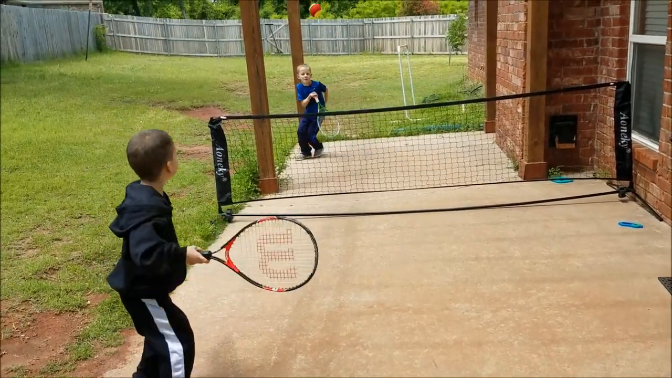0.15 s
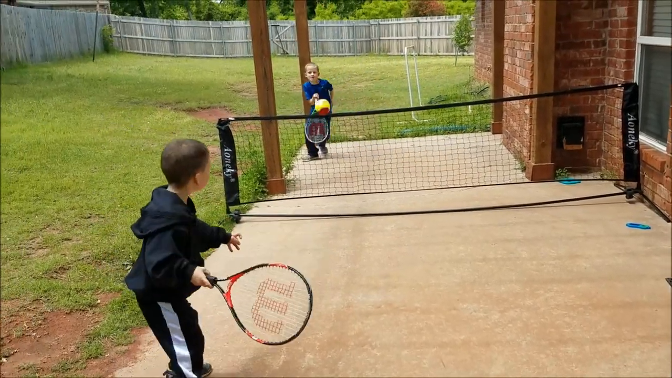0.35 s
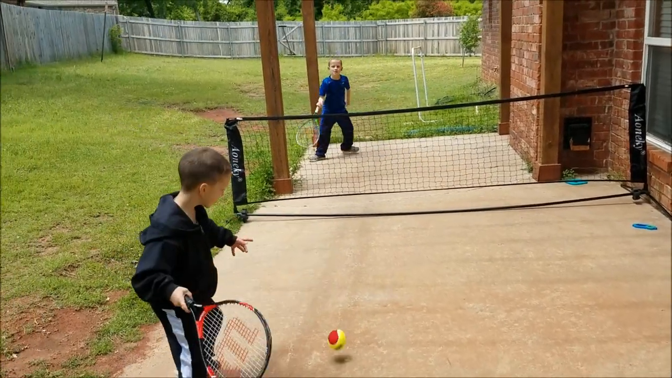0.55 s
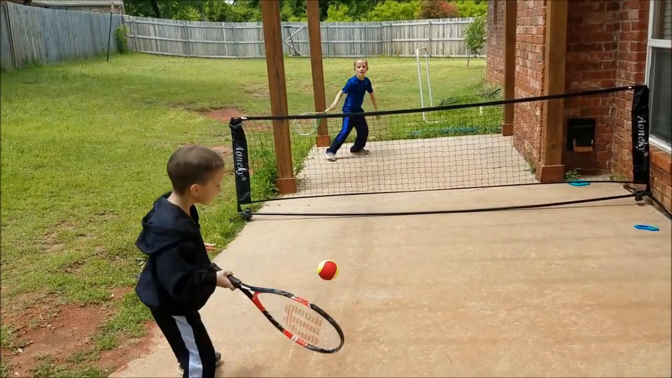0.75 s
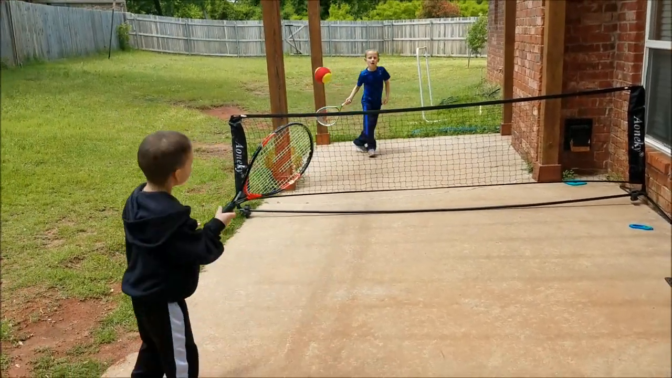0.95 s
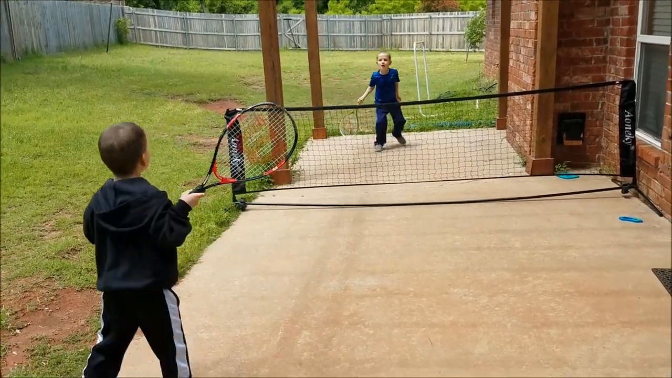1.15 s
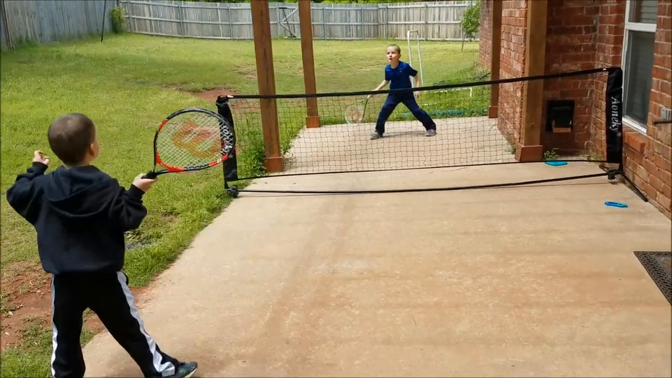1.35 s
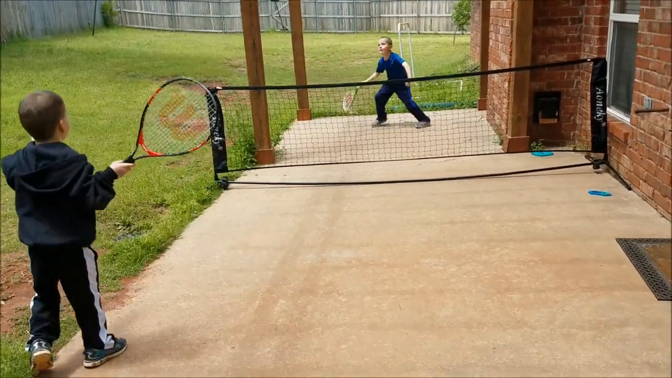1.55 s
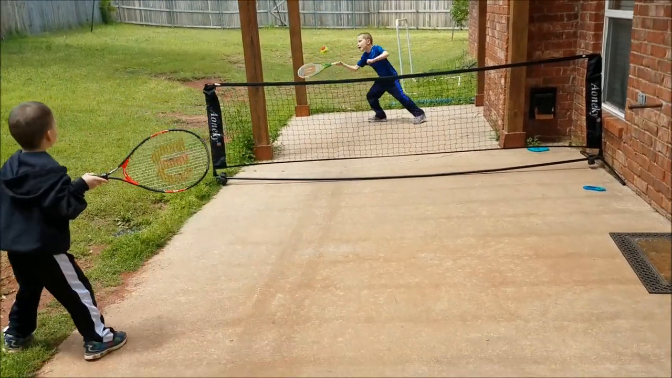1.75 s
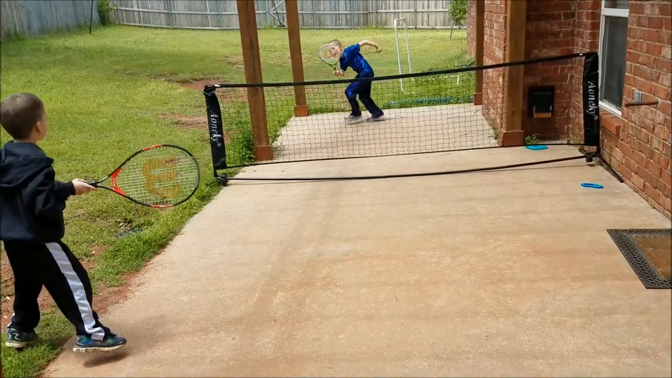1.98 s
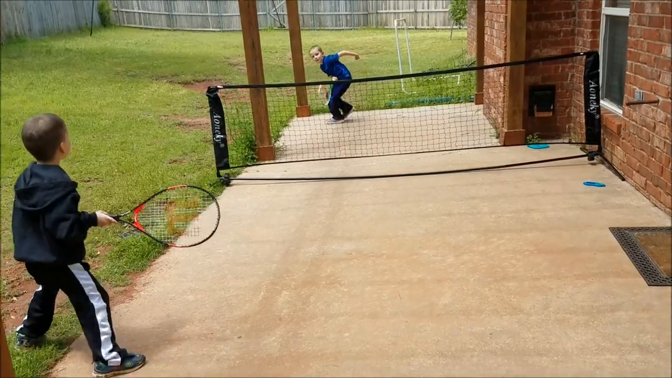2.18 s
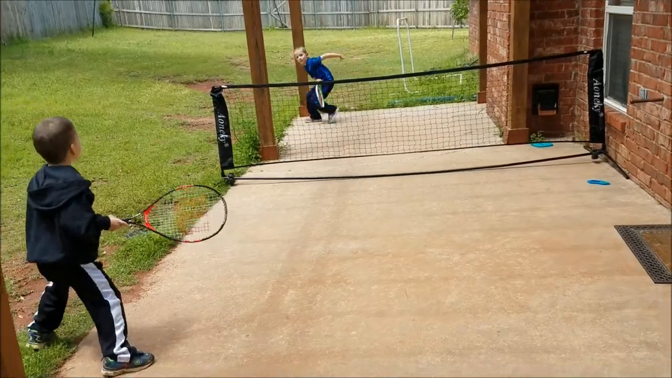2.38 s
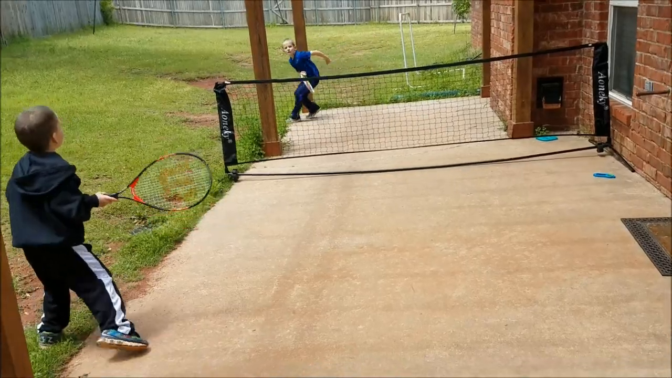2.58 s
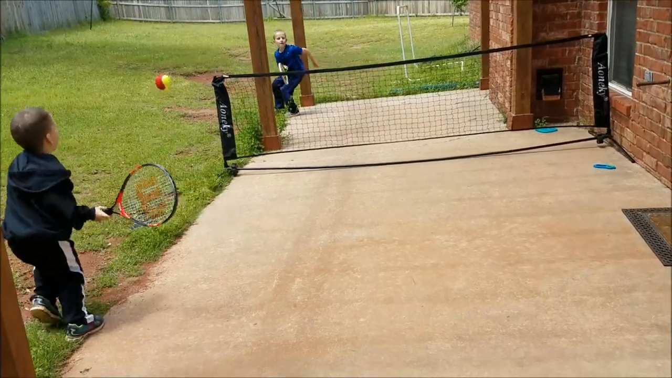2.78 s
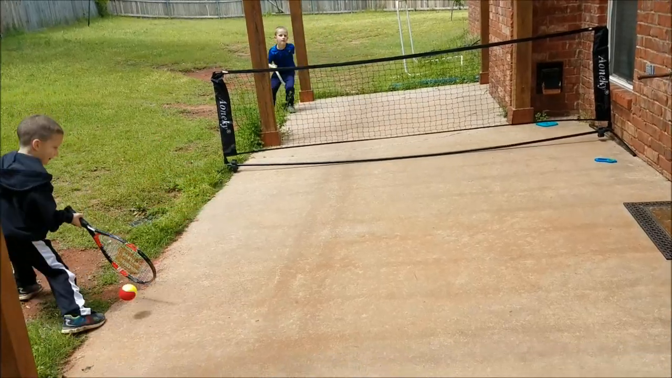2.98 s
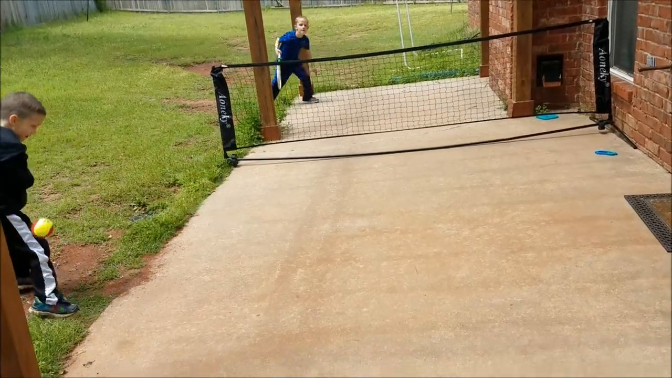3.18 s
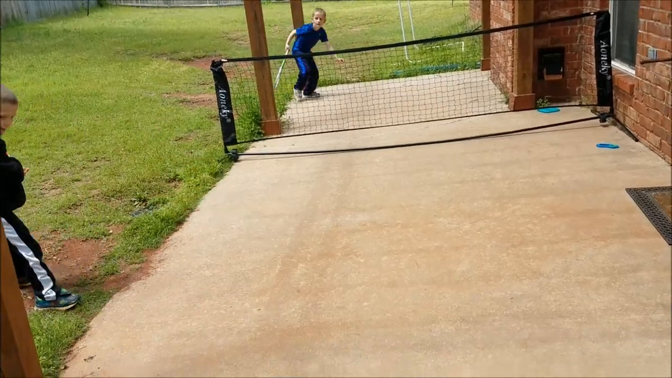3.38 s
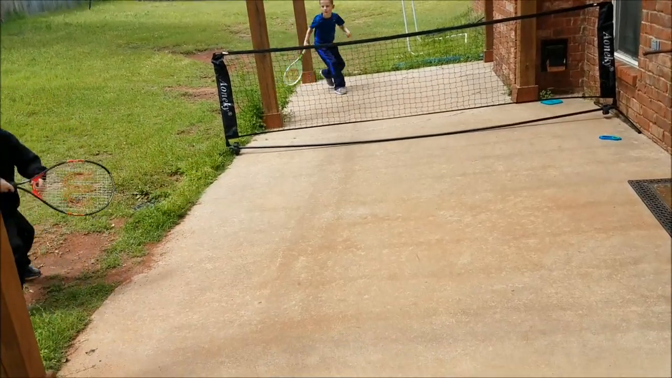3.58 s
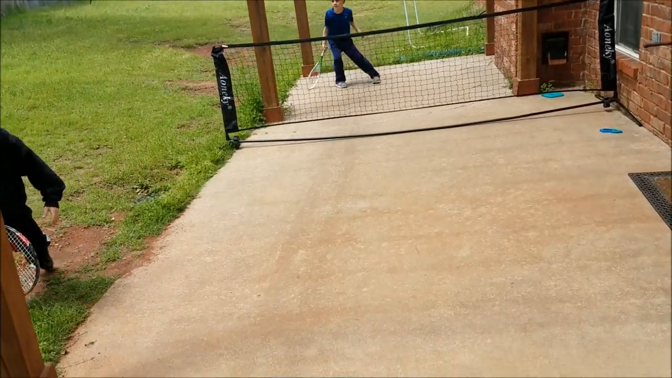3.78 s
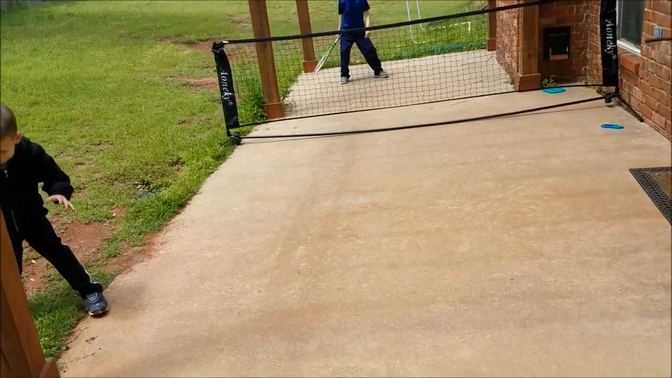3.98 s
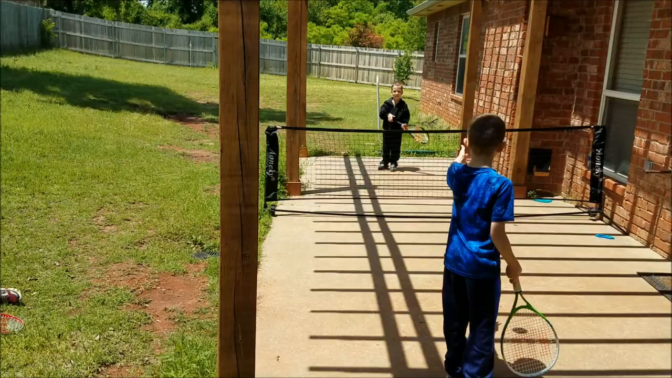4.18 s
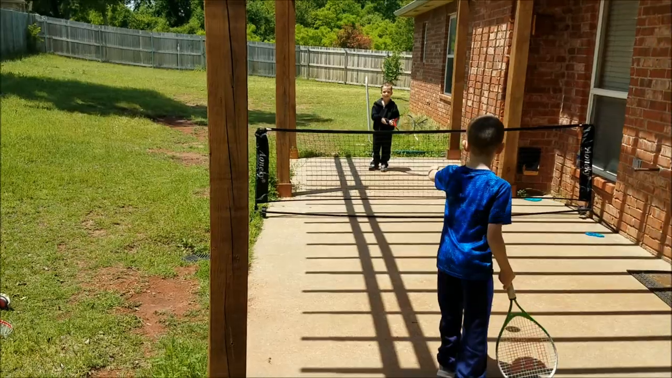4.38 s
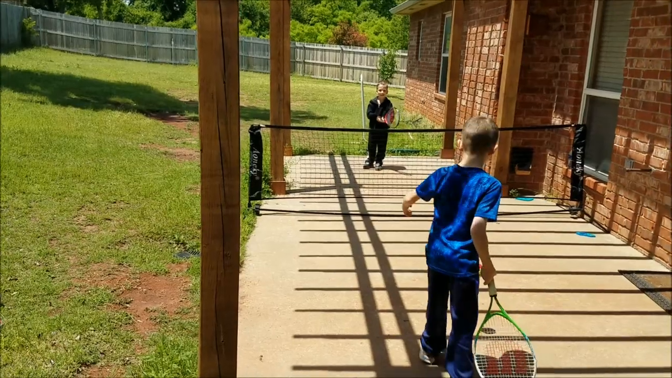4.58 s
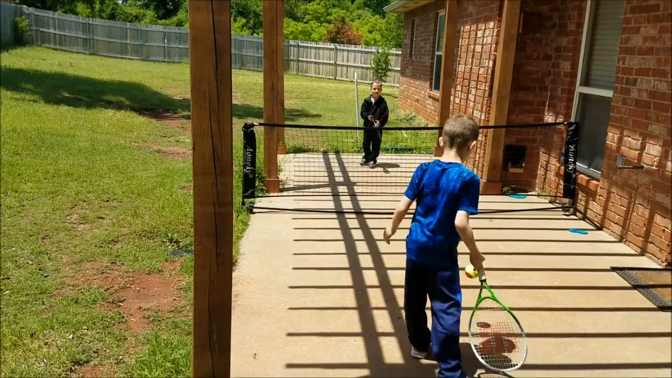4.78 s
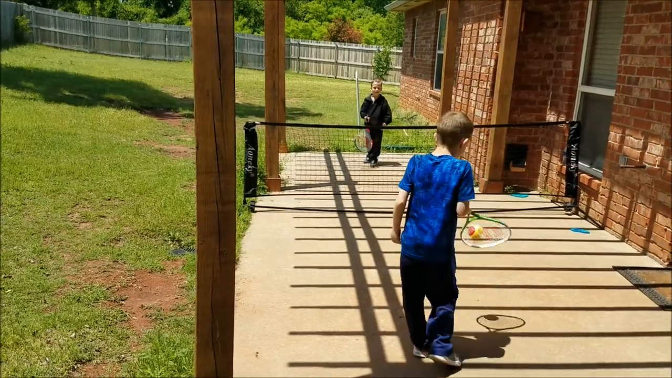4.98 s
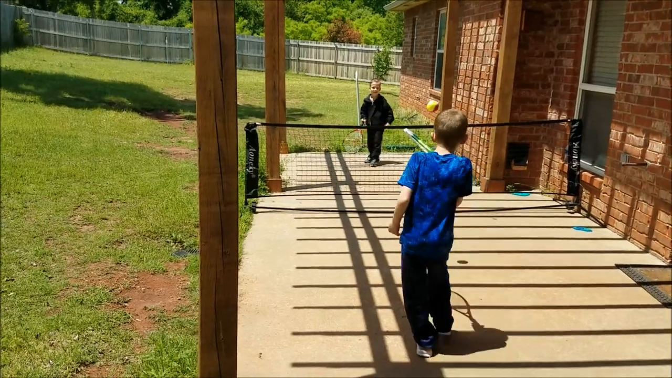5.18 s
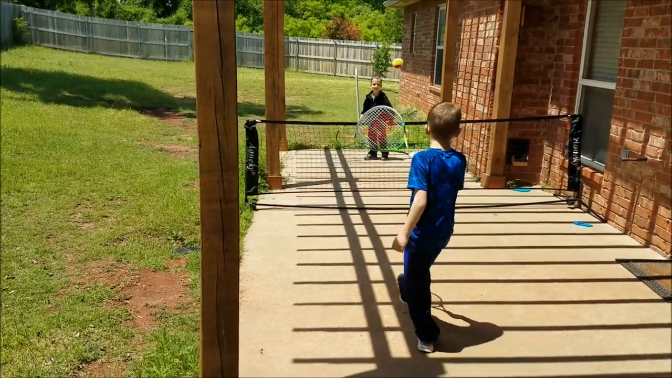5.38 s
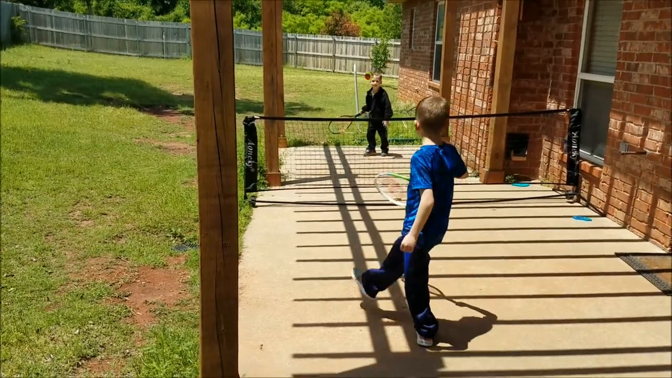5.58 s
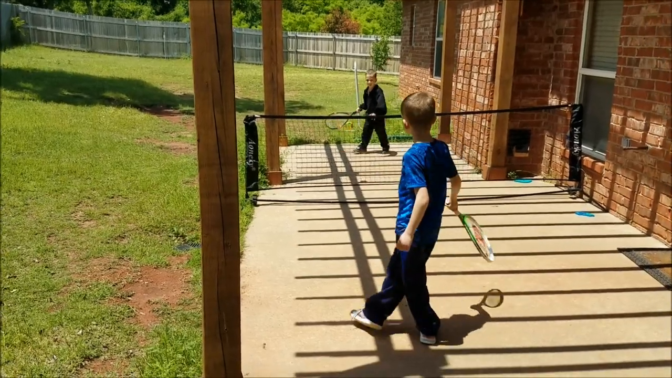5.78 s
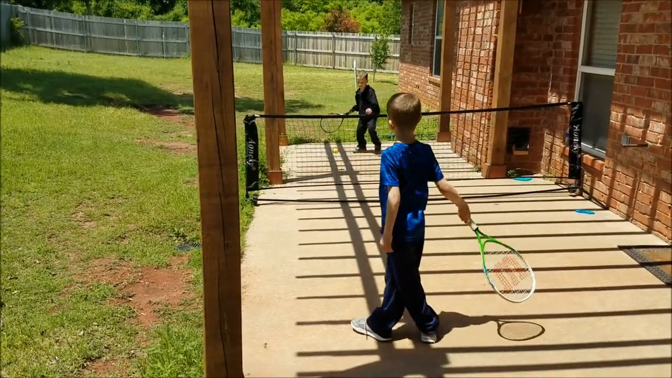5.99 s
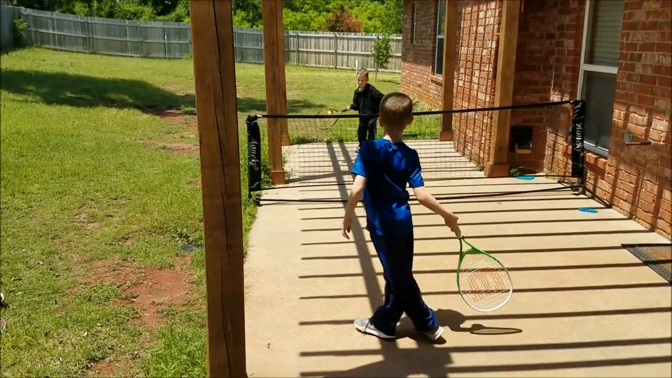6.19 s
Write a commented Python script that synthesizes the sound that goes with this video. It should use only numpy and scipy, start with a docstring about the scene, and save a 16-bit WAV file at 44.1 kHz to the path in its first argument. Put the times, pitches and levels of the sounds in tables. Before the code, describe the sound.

On a roofed concrete patio, shoes drag and scuff over grit, then a hollow ball bounces sharply and a strung racket pops it away. Softer hits and bounces follow, with scuffing feet, heavy footfalls and a racket frame clack. The sound cuts out just after four seconds and fades back into a shorter, quieter rally with faint far whistles. Close stereo microphones catch light air and low wind buffeting.

```python
"""Two children play mini tennis close by on a roofed concrete patio beside a brick wall, heard by two microphones.
First shoes drag and land on grit; then a hollow ball bounces and small strung rackets strike it, ringing their modes.
A far whistle (wavering tone) and a racket frame's clack (coloured noise) come late in this first rally.
Near 4.1 s the sound drops out, then fades back in on a second, shorter rally, with more far whistles towards its end.
Outdoor air (shaped noise) and low buffeting at the microphones lie under it all; the patio answers ball, frame and feet."""
import sys
import numpy as np
from scipy import signal
from scipy.fft import rfft, irfft
from scipy.io import wavfile

SR = 44100
rng = np.random.default_rng(int(sys.argv[2]) if len(sys.argv) > 2 else 0)


def digitize_waveform(pressure):
    """Quantize a signal to 16-bit integers and store it at the path in sys.argv[1].

    Rows of a 2-D input are taken as channels; values are limited to [-1, 1].
    """
    field = np.atleast_2d(pressure).T
    bounded = np.clip(field, -1, 1)
    quanta = np.round(bounded * 32767).astype(np.int16)
    wavfile.write(sys.argv[1], SR, quanta)


N = 275625

# outdoor air in the first and in the second rally: [f/Hz, level/dB per Hz]
AIR_FIRST = [(20, -13.5), (70, -21.5), (130, -31.5), (220, -9.5), (400, -4.5), (620, -2.5), (900, -7),
             (1500, -6.5), (2400, -6.5), (3500, -9), (5200, -17), (8000, -21), (12000, -20), (16000, -21.5)]
AIR_SECOND = [(20, -16), (70, -26), (130, -40), (220, -7.5), (420, -2.5), (600, -2), (900, -8), (1500, -9),
              (2400, -10.5), (3500, -11), (5200, -19), (8000, -25), (12000, -25), (16000, -24.5)]
# low buffeting at the microphones: [f/Hz, level/dB per Hz]
BUFFETING = [(15, -30), (50, -7), (90, -1), (130, -4), (200, -8.5), (320, -13), (700, -42.5), (3000, -63)]
# swells of the buffeting: [peak t/s, half-length t/s, level/dB]
GUSTS = [(.77, 0.34, -48), (1.896, 0.13, -58.5), (3.774, 0.29, -47), (4.746, 0.68, -53)]
# faint far whistles, perhaps birds: [start t/s, length t/s, f/Hz, level/dB]
WHISTLES = [(3.077, .12, 3340, -56), (5.42, .2, 2120, -61), (5.586, 0.18, 2700, -64),
            (5.63, 0.194, 2120, -63), (6.017, 0.25, 2420, -58.5)]
# a shoe lands on grit: [t/s, skid t/s, grit level/dB, footfall level/dB]
STEPS = [(.353, 0.021, -30.5, -43), (1.021, 0.037, -44.5, -47.5), (1.532, 0.041, -39.5, -47),
         (1.82, 0.03, -47, -64), (2.071, .02, -44.5, -50), (2.185, .03, -51, -51.5),
         (2.326, 0.038, -47, -63), (2.576, 0.041, -44.5, -56), (2.756, 0.024, -44, -42.5),
         (2.964, 0.051, -44.5, -41), (3.562, 0.0059, -41, -48), (3.697, .009, -48, -51),
         (3.801, 0.0074, -26.5, -58), (4.004, 0.034, -43.5, -47), (4.646, 0.022, -52.5, -67),
         (5.818, 0.025, -51, -47), (5.868, 0.032, -48, -55.5)]
# a shoe is dragged over grit: [peak t/s, swell t/s, grit level/dB, footfall level/dB]
DRAGS = [(.03, 0.054, -38, -41.5), (.15, 0.072, -44, -64), (.2, .019, -29, -51), (1.30, 0.024, -40, -45),
         (1.355, 0.036, -39, -49.5), (1.42, .09, -41, -66), (1.563, 0.024, -33.5, -42.5),
         (1.695, 0.043, -48.5, -53.5), (2.63, 0.023, -44, -38), (3.12, 0.075, -48, -44),
         (3.785, 0.06, -40, -47), (4.825, 0.058, -50.5, -68), (5.415, 0.029, -55.5, -64),
         (6.24, 0.073, -43, -52)]
# single grains of grit snapping under a sole: [t/s, relative level/dB, left-right level/dB]
SNAPS = [(.5252, -26, 7), (.551, -25, 10), (2.796, -21, 1), (3.069, -26.5, 5), (4.857, -24, -13),
         (5.87, -16, 3), (5.889, -20.5, 6)]
# heavy footfalls close by: [t/s, level/dB]
THUDS = [(2.976, -33), (3.602, -21.5), (4.004, -31.5), (4.0324, -18.5)]
# colours of sanded grit, of rasping rubber or felt, and of the foot's weight: [f/Hz, level/dB per Hz]
GRIT = [(1500, -37), (3500, -11), (5500, -6), (7500, -7), (10000, -6), (12500, 0), (14500, 2.5),
        (16000, -3)]
RASP = [(300, -23), (800, -10), (1500, -4), (2300, -1.5), (3200, -4.5), (4500, -9.5), (8000, -30.5)]
FOOTFALL = [(40, -28.5), (150, -10), (300, 0.5), (700, 4.5), (1200, -4), (2200, -9), (5000, -58)]
# racket frame chattering on concrete: [t/s, level/dB]
CLACKS = [(3.73, -27)]
# resonances of that frame: [f/Hz, level/dB per Hz]
FRAME = [(900, -17), (1470, -13.5), (1920, 0), (2250, -13), (3000, 0.5), (3900, -15), (4700, -11.5),
         (5900, -25), (8000, -23.5), (11000, -27), (14500, -21)]
# racket on ball: [t/s, first touch level/dB, launch level/dB, contact t/s,
#                  wall echo delay t/s, wall echo level/dB, left-right level/dB]
STRIKES = [(0.8394, -20.5, -4.5, .0055, .026, -10.5, 4.5), (1.815, -23.5, -21, .0025, .0092, -4, 8),
           (5.0222, -39, -25, .0061, .017, -7, 0)]
# ball on the slab, and two thumps (3.59, 4.03 s) of the ball on something else or of a foot: # [t/s, landing
# level/dB, lift-off level/dB, crack f/Hz, contact t/s, # low push level/dB, left-right level/dB]
BOUNCES = [(0.611, -2, -10, 1824, .0052, -12, 9), (2.116, -28.5, -33.5, 1010, 0.0029, -38, 1),
           (2.3527, -13, -18.5, 1840, 0.0033, -31, 6), (2.9993, -6.5, -7.5, 1660, 0.00498, -20.5, 6.5),
           (3.205, -25, -38, 1410, .0042, -39.5, 12), (3.5902, -7.5, -22, 1750, 0.0034, -19.5, 6.5),
           (4.032, -27.5, -37, 1240, .002, -29.5, 13), (4.7081, -11.5, -20, 1460, .0058, -23, 2.5),
           (5.9591, -18, -24, 1640, .0051, -36.5, 0)]
# modes of the hollow ball and of the strung racket: [nominal f/Hz, level/dB, 60 dB decay t/s]
BALL_MODES = [(576, -0.5, 0.023), (752, -2, 0.021), (1068, 3, 0.048), (1260, -6, 0.027),
              (1610, -17.5, 0.019), (2060, -8.5, 0.031), (2150, -5, 0.049), (2666, -7.5, 0.051)]
STRING_MODES = [(595, -8, 0.032), (680, 3, 0.019), (948, -4.5, 0.034), (1104, 0.5, 0.073),
                (1100, -30, 0.027), (1337, -8.5, .03), (1483, -2, 0.08), (2030, -14, 0.044),
                (2800, -15, 0.022)]
# patio reverberation: [f/Hz, 60 dB decay t/s]
PATIO_DECAY = [(100, 0.31), (250, 0.14), (600, .2), (1200, 0.24), (2500, 0.19), (6000, 0.41), (14000, 0.19)]
# colour of that reverberation: [f/Hz, level/dB]
PATIO_COLOUR = [(100, 2.5), (200, 1.5), (400, 5), (700, 0.5), (1200, -1), (2300, 1), (4000, -2.5),
                (14000, -5)]
# how alike the two microphones hear diffuse sound: [f/Hz, likeness 0-1]
LIKENESS = [(50, 0.89), (150, 0.9), (300, 0.82), (600, 0.53), (1200, 0.074), (3000, 0.066), (8000, 0.74),
            (15000, 0.17)]
# the two microphones differ in colour: [f/Hz, left-right level/dB]
MICROPHONES = [(100, -0.5), (400, -1.5), (1000, 1), (2300, 7), (5000, 1.5), (9000, -1.5), (13500, 3)]

HIT_T = np.arange(SR // 2) / SR  # time within one short sound (s)
DROP_S, RESUME_S = 4.136, 4.26  # the sound drops out between the two rallies (s)
# fainter hits are farther off, so wetter: room level of a 0 dB hit (dB), and its rise per dB of weakness
ROOM_DB, ROOM_SLOPE = -6.5, 0.28
# the right microphone hears the ball later in the first rally and earlier in the second (s)
FIRST_LAG_S, SECOND_LEAD_S = 0.00018, 0.0001


def from_db(db):
    """Decibels to gain."""
    return 10 ** (np.asarray(db) / 20)


def read(points, hz):
    """Joins a table's points by straight lines on a log-frequency axis."""
    f, value = np.transpose(points)
    return np.interp(np.log(hz + 1), np.log(f + 1), value)


def add(mix, s, sound):
    """Lays a stereo sound into the mix at time s, trimmed at both ends of the mix."""
    start = round(s * SR)
    sound = sound[:, max(-start, 0):]
    part = mix[:, max(start, 0):][:, :sound.shape[1]]
    part += sound[:, :part.shape[1]]


def play(source, table):
    """Sounds every row of an event table."""
    mix = np.zeros((2, N))
    for row in table:
        add(mix, *source(*row))
    return mix


def pair(x, spectrum):
    """Colours two unrelated signals and shares part of the first, as two close microphones share the bass."""
    hz = np.fft.rfftfreq(x.shape[1], 1 / SR)
    left, other = rfft(x)
    same = np.clip(read(LIKENESS, hz), 0, 1)
    right = same * left + np.sqrt(1 - same ** 2) * other
    return irfft(np.array([left, right]) * from_db(read(spectrum, hz)), x.shape[1])


def noise(spectrum, size, grain_db=0):
    """Stereo noise of rms 1; grain_db spreads the sizes of its grains."""
    grains = from_db(grain_db * np.minimum(rng.exponential(1, size), 5))
    x = pair(rng.standard_normal((2, size)) * grains, spectrum)
    return x / np.sqrt(np.mean(x ** 2))


def sides(pan_db):
    """Left and right gains for a level difference; positive leans left."""
    return from_db(np.array([[pan_db], [-pan_db]]) / 2)


def place(x, pan_db, lag, shade_hz=750):
    """The camera body shades the far microphone, mostly in the treble; the right one hears lag seconds later."""
    size = x.shape[-1]
    hz = np.fft.rfftfreq(2 * size, 1 / SR)
    shade = sides(pan_db) ** (hz ** 2 / (hz ** 2 + shade_hz ** 2))
    late = np.exp(-2j * np.pi * hz * np.array([[0], [lag]]))
    return irfft(rfft(x, 2 * size) * shade * late)[:, :size]


def patio(x, first=0.0028, build=0.0016):
    """Scattered reflections from roof, posts and wall; each band dies at its own speed."""
    size = len(HIT_T)
    # sparse echoes of random sign, about 5000 per second
    taps = rng.choice([-1., 1.], (2, size)) * (rng.random(size) < 5000 / SR)
    hz, t, bands = signal.stft(taps, SR, nperseg=256)
    decay = from_db(-60 * t / read(PATIO_DECAY, hz)[:, None])
    tail = signal.istft(bands * decay, SR, nperseg=256)[1][:, :size]
    tail = tail * np.clip((HIT_T - first) / build, 0, 1)
    tail = pair(tail / np.linalg.norm(tail[0]), PATIO_COLOUR)[:, :size // 2]
    return signal.fftconvolve(np.atleast_2d(x), tail, axes=1)[:, :x.shape[-1]]


def air(first_db=-51, later_db=-53.5, pan_db=2, calm_db=-60):
    """Steady outdoor hush, a little duller in the second rally, with low buffeting that swells in gusts."""
    t = np.arange(N) / SR
    first = from_db(first_db) * sides(pan_db) * noise(AIR_FIRST, N)
    second = from_db(later_db) * sides(pan_db) * noise(AIR_SECOND, N)
    hush = np.where(t > RESUME_S, second, first)
    gust_power = sum((from_db(db) * np.exp(-((t - s) / width) ** 2)) ** 2 for s, width, db in GUSTS)
    return hush + np.sqrt(from_db(calm_db) ** 2 + gust_power) * noise(BUFFETING, N)


def whistle(s, length, hz, db, waver=0.0088):
    """A nearly pure, slightly wavering far tone that swells and fades."""
    t = np.arange(0, length, 1 / SR)
    drift = np.interp(t, np.linspace(0, length, 8), rng.standard_normal(8))
    phase = 2 * np.pi * np.cumsum(hz * (1 + waver * drift)) / SR
    tone = np.sin(phase) * np.sin(np.pi * t / length)
    return s, place(from_db(db) * tone, 0, 0)


def scuff(s, rise, fall, grit_db, foot_db, rasp_db, rasp_hz, pan_db, hold=0.0035, slip_db=-0.5):
    """A sole moves over sand: grains hiss, rubber rasps along with them, the foot's weight sounds below."""
    t, size = HIT_T - rise, len(HIT_T)
    pressure = np.clip(HIT_T / rise, 0, 1) * np.exp(-np.maximum(t - hold, 0) / fall)
    # small uneven slips, drawn anew every 200 samples
    slips = np.interp(np.arange(size), np.arange(0, size, 200), rng.standard_normal(size // 200 + 1))
    sole = np.array(RASP) * [rasp_hz / 2300, 1]  # moves the rasp's 2300 Hz peak to rasp_hz
    grit = noise(GRIT, size, grain_db=4.0) + from_db(rasp_db) * noise(sole, size, grain_db=4.5)
    foot = from_db(foot_db) * noise(FOOTFALL, size)
    return s - rise, place(pressure * (grit * from_db(grit_db + slip_db * slips) + foot), pan_db, 0)


def step(s, skid, grit_db, foot_db, attack=0.0036):
    """A shoe lands abruptly and skids to rest."""
    return scuff(s + attack, attack, skid, grit_db, foot_db, rasp_db=-1.0, rasp_hz=2170, pan_db=1.0)


def drag(s, swell, grit_db, foot_db, rise_share=1.05):
    """A sliding shoe builds up about as slowly as it dies away."""
    return scuff(s, rise_share * swell, swell, grit_db, foot_db, rasp_db=-4, rasp_hz=2220, pan_db=1)


def snap(s, db, pan_db, fall=0.001):
    """One grain cracks: a tiny bright tick."""
    tick = noise(GRIT, len(HIT_T)) * np.exp(-HIT_T / fall)
    return s, from_db(db - 13) * sides(pan_db) * tick


def stray_grit(count=14, db=-38, spread_db=6, pan_db=5):
    """Faint grains snap at random moments and at slightly different levels."""
    draws = rng.random((count, 2))
    return play(snap, [(when * N / SR, db + spread_db * size, pan_db) for when, size in draws])


def thud(s, db, hz=135, fall=0.0042):
    """A heel gives one heavily damped low swing."""
    swing = np.cos(2 * np.pi * hz * HIT_T) * np.exp(-HIT_T / fall) * np.minimum(HIT_T / 0.00058, 1)
    return s, place(from_db(db) * swing, 0, 0)


def clack(s, db, fall=0.0083):
    """The hollow frame chatters briefly on the rough slab."""
    chatter = noise(FRAME, len(HIT_T), grain_db=1.5) * np.exp(-HIT_T / fall)
    return s, from_db(db) * place(chatter + from_db(-9.0) * patio(chatter), pan_db=2.5, lag=0)


def ring(modes, t, detune=0.026, attack=0.00044):
    """Decaying modes set going at t = 0; each blow lands on another spot and shifts them a little."""
    t = np.maximum(t, 0)
    tones = 0
    for hz, db, t60 in modes:
        shifted_hz = hz * (1 + detune * rng.standard_normal())
        tones = tones + from_db(db - 60 * t / t60) * np.sin(2 * np.pi * shifted_hz * t)
    return tones * (1 - np.exp(-(t / attack) ** 2))


def crack(t, hz, cycles, top_hz):
    """A snap of about one cycle, its treble softened by the felt."""
    t = np.maximum(t, 0)
    sharp = -np.sin(2 * np.pi * hz * t) * np.exp(-hz * t / cycles)
    return signal.sosfilt(signal.butter(5, top_hz, fs=SR, output="sos"), sharp)


def push(t, contact, swell=0.57):
    """The ball flattens and springs back: a low swing of pressure that swells and dies in about two cycles."""
    u = t / (swell * contact)  # the swing is strongest at u = 1
    return np.sin(2 * np.pi * t / contact) * u * np.exp((1 - u ** 1.5) / 1.5)


def outdoors(x, s, db, pan_db, delay, echo_db, second_db=-17, second_delay=0.011, room_pan_db=2, low_hz=115):
    """Direct sound, a slap from the wall, a later one from the roof, and the scattered tail."""
    x = signal.sosfilt(signal.butter(2, low_hz, "high", fs=SR, output="sos"), x)  # a small body radiates little bass
    lag = FIRST_LAG_S if s < DROP_S else -SECOND_LEAD_S
    direct = place(x, pan_db, lag)
    wall = from_db(echo_db) * np.roll(direct, round(delay * SR), 1)
    roof = from_db(second_db) * np.roll(direct, round((delay + second_delay) * SR), 1)
    room = from_db(ROOM_DB - ROOM_SLOPE * db) * place(patio(x), room_pan_db, 0)
    return direct + wall + roof + room


def strike(s, touch_db, db, contact, echo_delay, echo_db, pan_db,
           crack_hz=1340, push_db=-15, push_slope=0.63, ring_db=-15):
    """The strings catch the ball softly and creak over its felt, then fling it off and are left ringing."""
    t = HIT_T
    creak = noise(RASP, len(t), grain_db=2)[0] * np.exp(-t / 0.003) * np.minimum(t / 0.00029, 1)
    catch = crack(t, crack_hz, cycles=0.37, top_hz=5.5 * crack_hz)
    touch = from_db(touch_db) * (catch + from_db(-9.0) * creak)
    launch = crack(t - contact, 0.86 * crack_hz, cycles=1.45, top_hz=1.77 * crack_hz)
    strings = from_db(ring_db) * ring(STRING_MODES, t - contact)
    squash = from_db(push_db + push_slope * db) * push(t, contact)
    sound = touch + from_db(db) * (launch - strings) + squash
    return s, outdoors(sound, s, db, pan_db, echo_delay, echo_db)


def bounce(s, db, lift_db, hz, contact, push_db, pan_db,
           ring_db=-22, sand_db=-41, sand_fall=0.021, echo_delay=0.012):
    """A crack on landing, a push while squashed, a duller crack on lift-off; the shell rings, felt brushes sand."""
    t = HIT_T
    landing = crack(t, hz, cycles=0.58, top_hz=3.0 * hz)
    lift_off = from_db(lift_db) * crack(t - contact, 0.68 * hz, cycles=0.99, top_hz=2.2 * hz)
    shell = from_db(ring_db) * ring(BALL_MODES, t)
    sand = from_db(sand_db) * noise(GRIT, len(t), grain_db=7)[0] * np.exp(-t / sand_fall)
    squash = from_db(push_db) * push(t, contact)
    sound = from_db(db) * (landing - shell + sand) + lift_off + squash
    return s, outdoors(sound, s, db, pan_db, echo_delay, echo_db=-13.5)


def scene(feet_room_db=-7):
    """Outdoor air far behind, feet and frame on the slab, ball and rackets in front."""
    background = air() + play(whistle, WHISTLES)
    feet = play(step, STEPS) + play(drag, DRAGS) + play(snap, SNAPS) + stray_grit() + play(thud, THUDS)
    feet = feet + from_db(feet_room_db) * patio(feet)
    ball = play(strike, STRIKES) + play(bounce, BOUNCES)
    return background + feet + play(clack, CLACKS) + ball


def dropout(fall_db_per_s=700, floor_db=-42, fade_in_s=0.62, fade_power=0.63):
    """The gain falls quickly to near silence, then fades back in, fast at first."""
    t = np.arange(N) / SR
    out = from_db(np.maximum(-fall_db_per_s * np.maximum(t - DROP_S, 0), floor_db))
    back = np.clip((t - RESUME_S) / fade_in_s, 0, 1) ** fade_power
    return np.maximum(out, back)


def record(dry, edge_hz=16100):
    """Microphone colour, the dropout with its fade-in, then the band limit."""
    tilt = sides(1) ** read(MICROPHONES, np.fft.rfftfreq(N, 1 / SR))
    coloured = irfft(rfft(dry) * tilt, N)
    band_limit = signal.firwin(511, edge_hz, window=("kaiser", 9), fs=SR)
    return signal.oaconvolve(coloured * dropout(), band_limit[None], "same")


dry = scene()
out = record(dry)
digitize_waveform(out)
```